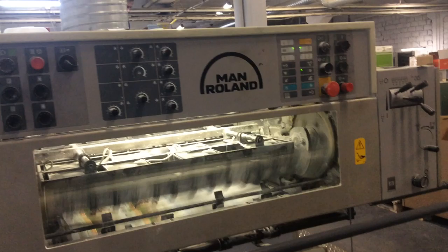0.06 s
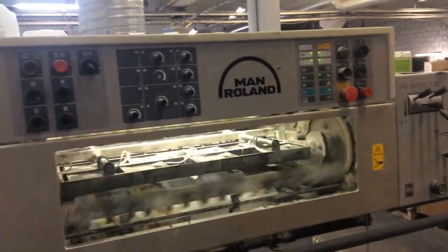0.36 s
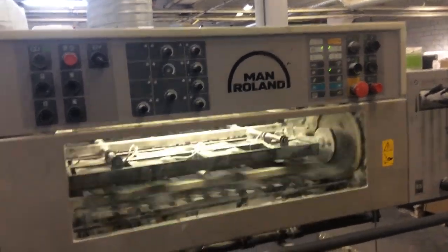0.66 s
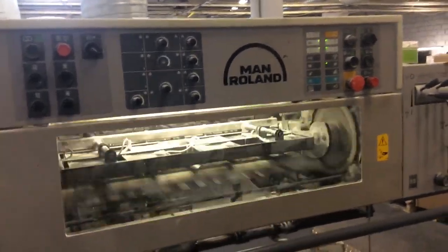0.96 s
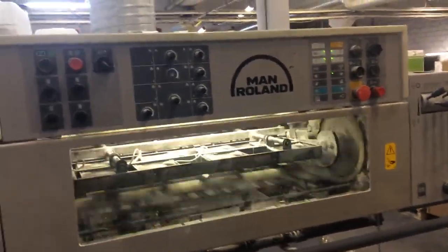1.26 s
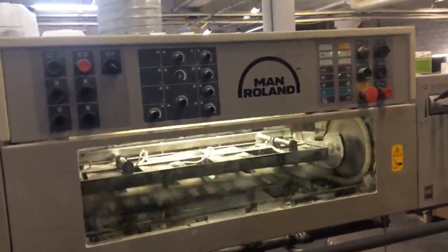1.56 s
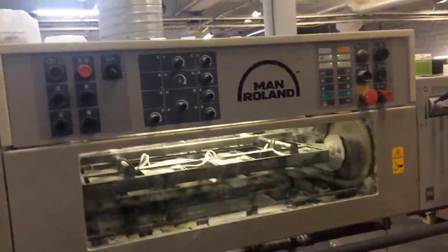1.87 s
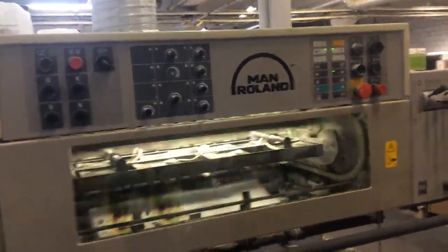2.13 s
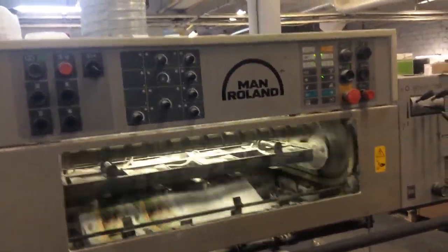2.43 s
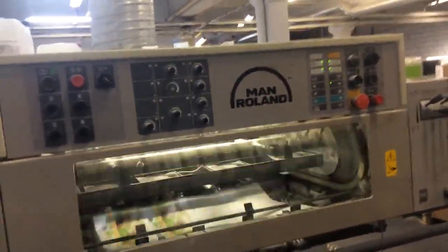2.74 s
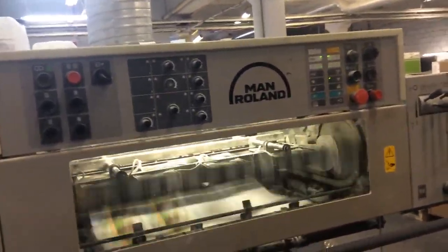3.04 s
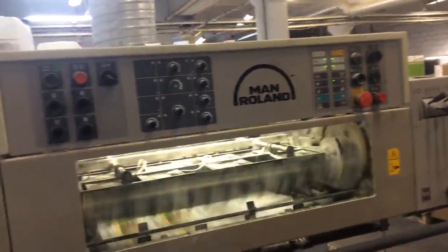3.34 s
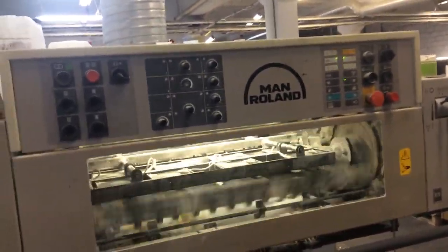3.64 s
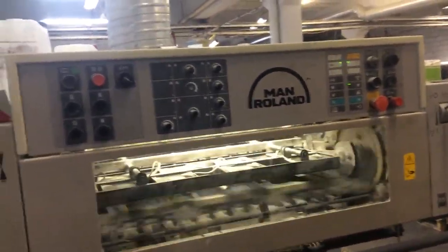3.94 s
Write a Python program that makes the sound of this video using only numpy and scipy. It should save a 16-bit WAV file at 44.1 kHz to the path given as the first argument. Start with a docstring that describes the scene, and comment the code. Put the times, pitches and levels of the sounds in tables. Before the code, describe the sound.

A large printing press runs steadily in a factory hall, heard up close. High air hiss swells about three times a second with a few sharp spits, over rumbling gears, dull knocks, a pump whine and motor hum.

```python
"""Suction air hisses through a narrow resonance near 5 kHz, swelling once a sheet, with a few sharp spits.
It is the delivery window of a sheet-fed offset press in a factory hall, at about three sheets a second.
Gears and gripper chains rumble and knock alike on every turn; an air pump whines and the motor hums."""
import sys
import numpy as np
from scipy import signal
from scipy.fft import rfft, irfft, next_fast_len
from scipy.io import wavfile
from scipy.ndimage import map_coordinates

SR = 44100
rng = np.random.default_rng(int(sys.argv[2]) if len(sys.argv) > 2 else 0)


def file_out(sig):
    """Save sig as 16-bit WAV at sys.argv[1]."""
    # one column per channel
    cols = np.atleast_2d(sig).T
    # limit, then scale
    lim = np.clip(cols, -1, 1)
    pcm = np.round(lim * 32767).astype(np.int16)
    wavfile.write(sys.argv[1], SR, pcm)


N = 176400
TURN_S = .3294


def suction_air():
    """Nozzles leak all the time; a valve opens for each sheet and the jet flutters and spits."""
    # valve openings: start_s, length_s, level_db
    puffs = [(-.08, 0.096, -20), (0.22, 0.1, -19), (0.562, 0.099, -19.5), (0.836, 0.13, -20.5),
             (1.205, 0.11, -18.5), (1.526, 0.12, -19.5), (1.86, .14, -19.8), (2.186, 0.095, -17.5),
             (2.53, 0.15, -20.5), (2.852, 0.11, -19), (3.172, 0.16, -21), (3.505, 0.14, -19.5),
             (3.833, 0.12, -19)]
    # brief spits: centre_s, length_s, level_db
    spits = [(0.457, .02, -20.5), (0.905, 0.013, -14), (1.093, .016, -19.5), (1.166, .03, -20.5),
             (1.46, 0.05, -23), (1.57, 0.0053, -22.5), (2.29, 0.0033, -16), (2.298, 0.0076, -18),
             (2.423, 0.072, -21), (2.963, 0.0076, -22), (3.2, 0.016, -21), (3.628, 0.0031, -19)]
    # spectra of puff, leak and bright spray: freq_hz, relative_db
    puff_spectrum = [(1500, -37.5), (2600, -23), (3450, -14), (3850, -22), (4400, -15), (4700, -4),
                     (4940, -0.5), (5250, -10), (5600, -20.5), (6200, -19), (8300, -24), (11000, -29),
                     (14500, -34)]
    leak_spectrum = [(1500, -40), (2500, -20), (3050, -15.5), (3300, -11), (3620, -11.5), (3800, -16.5),
                     (4400, -8), (4720, -4), (4940, -2), (5250, -12.5), (5650, -9.5), (6100, -22.5),
                     (8000, -32)]
    spray_spectrum = [(2000, -16), (5000, 10.5), (6800, 5.5), (8400, 7), (9400, 2.5), (10500, 2),
                      (11500, -2.5), (12500, -3), (13600, 2), (14500, -6.5)]
    attack_s, release_s = .045, .06
    leak_db, spray_db, flutter_db = -22, -26.5, 1.1
    t = np.arange(N) / SR
    puff, leak, spray = noise(puff_spectrum), noise(leak_spectrum), noise(spray_spectrum)
    power = np.zeros(N)
    for start_s, length_s, level_db in puffs:
        opening = (1 + np.tanh(2 * (t - start_s) / attack_s)) / 2
        closing = (1 - np.tanh(2 * (t - start_s - length_s) / release_s)) / 2
        power += amp(level_db) ** 2 * opening * closing
    for centre_s, length_s, level_db in spits:
        power += amp(level_db) ** 2 * np.exp(-(2 * (t - centre_s) / length_s) ** 2)
    drift = wobble(rate_hz=24)
    jet = np.sqrt(power) * puff + amp(leak_db + .3 * drift) * leak
    flutter = amp(flutter_db * wobble(rate_hz=300))
    return jet * flutter + amp(spray_db + .25 * drift) * spray


def gears():
    """The same teeth and chain links meet on every turn, so part of the roar repeats."""
    # gear roar: freq_hz, relative_db
    roar_spectrum = [(20, -34), (50, -25.5), (65, -11), (85, -8.5), (115, -2.5), (165, -6), (195, -5),
                     (220, -1.5), (295, 0.5), (370, -5.5), (415, -3), (490, -8), (700, -10), (1300, -11),
                     (2000, -14), (3000, -18.5), (6000, -26)]
    # repeating part of the roar: freq_hz, power_share
    repeats = [(60, .3), (150, .32), (280, .62), (600, .33), (1300, .17), (3000, .05)]
    roar_db = -27
    turn_samples = round(TURN_S * SR)
    one_turn = irfft(np.exp(2j * np.pi * rng.random(turn_samples // 2 + 1)), turn_samples)
    share = lambda hz: np.clip(log_interp(repeats, hz), 0, 1)
    repeating = filtered(unit_rms(np.resize(one_turn, N)), lambda hz: np.sqrt(share(hz)))
    loose = filtered(rng.standard_normal(N), lambda hz: np.sqrt(1 - share(hz)))
    return amp(roar_db) * coloured(repeating + loose, roar_spectrum)


def grippers():
    """Grippers and cams knock dully on the frame at fixed points of each turn."""
    # knocks within a turn: start_s, pitch_hz, level_db
    knocks = [(0.015, 306, -21.5), (.012, 485, -25.5), (0.106, 253, -24), (0.132, 307, -37),
              (0.136, 125, -32), (0.202, 350, -29), (0.242, 132, -26)]
    rise_s, t60_s, scatter_db = .002, .05, 1.2
    t = np.arange(N) / SR
    out = np.zeros(N)
    for start_s, pitch_hz, level_db in knocks:
        age_s = (t - start_s) % TURN_S
        ring = np.sin(2 * np.pi * pitch_hz * age_s) * (1 - np.exp(-age_s / rise_s))
        out += ring * amp(level_db + scatter_db * wobble(rate_hz=3.06) - 60 * age_s / t60_s)
    return out


def air_pump():
    """Overtones of the pump's vanes, slightly unsteady in pitch and level."""
    # whine: harmonic, level_db
    overtones = [(2, -46), (3, -48), (4, -51), (15, -54), (16, -55), (18, -51), (20, -48.5), (27, -51),
                 (28, -47), (29, -48), (30, -45), (32, -44), (34, -38), (37, -46.5), (39, -44), (41, -53)]
    fundamental_hz, waver_db = 146.9, 2.2
    pitch_hz = fundamental_hz * (1 + .0008 * wobble(rate_hz=8))
    phase = 2 * np.pi * np.cumsum(pitch_hz) / SR
    out = np.zeros(N)
    for harmonic, level_db in overtones:
        peak = np.sqrt(2) * amp(level_db + waver_db * wobble(rate_hz=7.2))
        out += peak * np.sin(harmonic * phase + 2 * np.pi * rng.random())
    return out


def motor():
    """The drive hums in low, wavering tones."""
    # hum: pitch_hz, level_db
    tones = [(60.5, -54), (118.3, -43.5), (144.5, -45), (592, -51.5)]
    waver_db, wander_rad = 2.2, .5
    t = np.arange(N) / SR
    out = np.zeros(N)
    for pitch_hz, level_db in tones:
        peak = np.sqrt(2) * amp(level_db + waver_db * wobble(rate_hz=3.8))
        phase = 2 * np.pi * (pitch_hz * t + rng.random())
        out += peak * np.sin(phase + wander_rad * wobble(rate_hz=2.9))
    return out


def reflected(x, t60_s, echo_db):
    """x plus its diffuse reflections, at about the same power."""
    tail = rng.standard_normal(SR) * amp(-60 * np.arange(SR) / SR / t60_s)
    echo = signal.fftconvolve(x, tail / np.linalg.norm(tail))[:N]
    return (x + amp(echo_db) * echo) / np.sqrt(1 + amp(echo_db) ** 2)


def amp(db):
    """Decibels to gain."""
    return 10 ** (np.asarray(db) / 20)


def unit_rms(x):
    """x at rms 1."""
    return x / np.sqrt(np.mean(x ** 2) + 1e-20)


def log_interp(points, hz):
    """(freq_hz, value) points read on a log frequency axis."""
    freq_hz, values = np.transpose(points)
    return np.interp(np.log(hz + 1), np.log(freq_hz + 1), values)


def wobble(rate_hz):
    """Smooth random curve, rate_hz knots a second."""
    knots = rng.standard_normal(int(N * rate_hz / SR) + 4)
    return map_coordinates(knots, [np.arange(N) * rate_hz / SR])


def filtered(x, response):
    """x through a zero-phase filter of gain response(hz)."""
    size = next_fast_len(N + SR // 2)
    return irfft(rfft(x, size) * response(np.fft.rfftfreq(size, 1 / SR)), size)[:N]


def coloured(x, spectrum):
    """x shaped by a spectrum, at rms 1."""
    return unit_rms(filtered(x, lambda hz: amp(log_interp(spectrum, hz))))


def noise(spectrum):
    """Fresh noise with the given spectrum, at rms 1."""
    return coloured(rng.standard_normal(N), spectrum)


def scene():
    """The hiss bounces inside the steel housing; hiss and knocks echo in the hall."""
    housed_hiss = reflected(suction_air(), t60_s=.16, echo_db=-11)
    hiss_and_knocks = reflected(housed_hiss + grippers(), t60_s=.4, echo_db=-14)
    return (gears() + air_pump() + motor() + hiss_and_knocks)[None]


def record(dry):
    """Brick-wall low-pass."""
    cutoff_hz = 14500
    return filtered(dry[0], lambda hz: hz < cutoff_hz)[None]


dry = scene()
out = record(dry)
file_out(out)
```